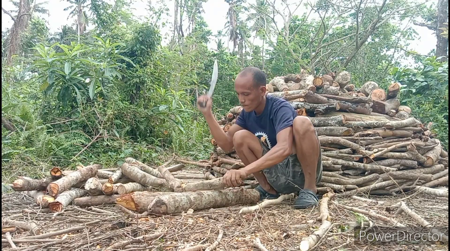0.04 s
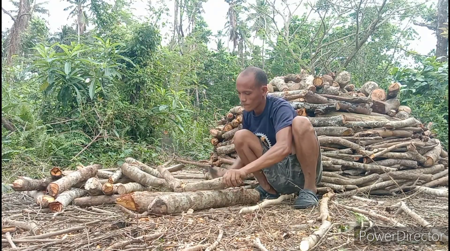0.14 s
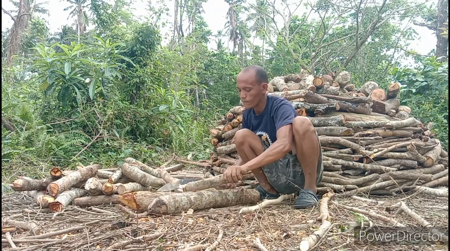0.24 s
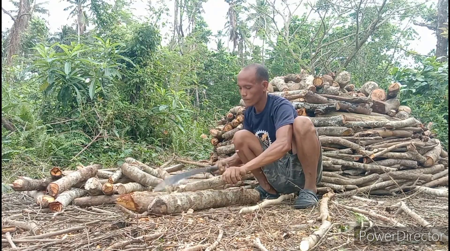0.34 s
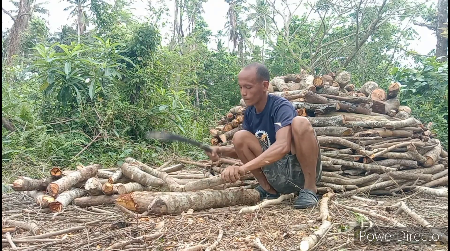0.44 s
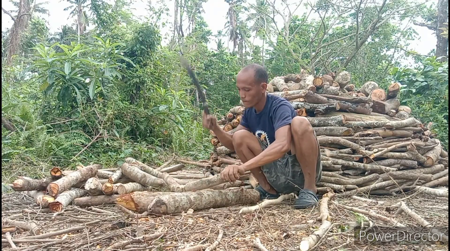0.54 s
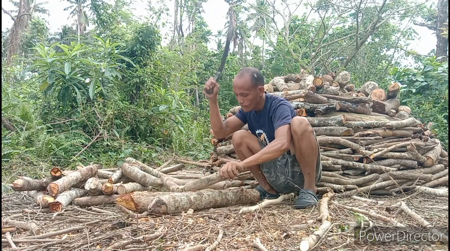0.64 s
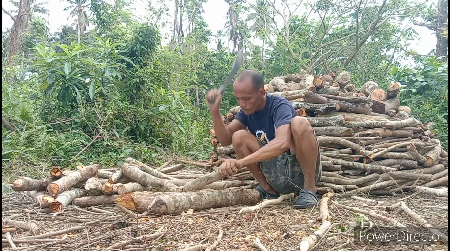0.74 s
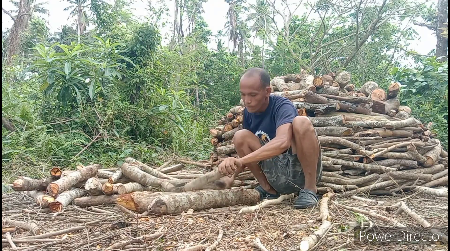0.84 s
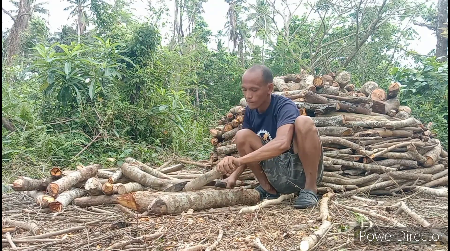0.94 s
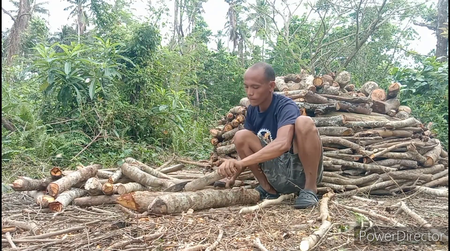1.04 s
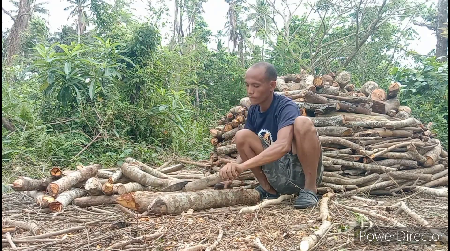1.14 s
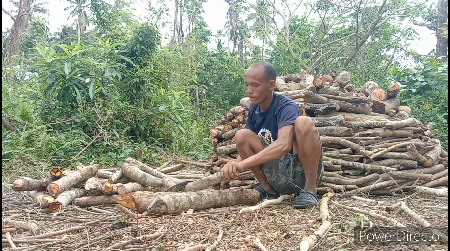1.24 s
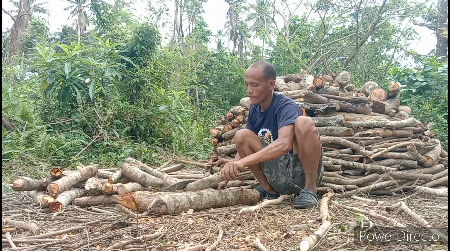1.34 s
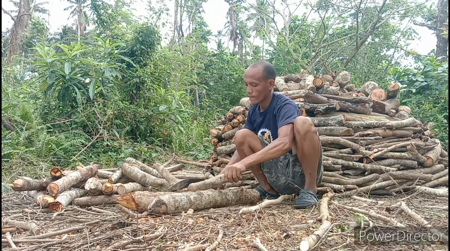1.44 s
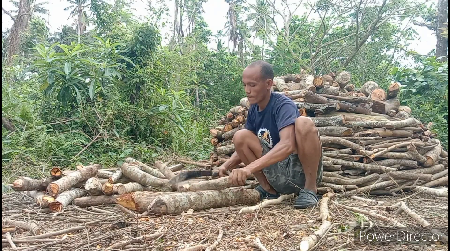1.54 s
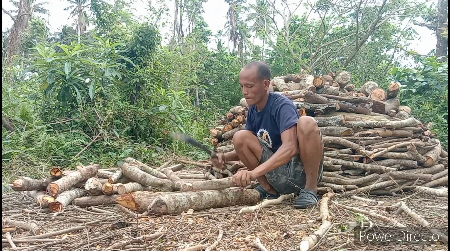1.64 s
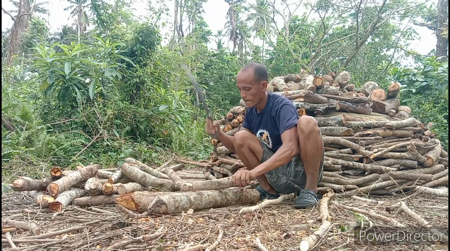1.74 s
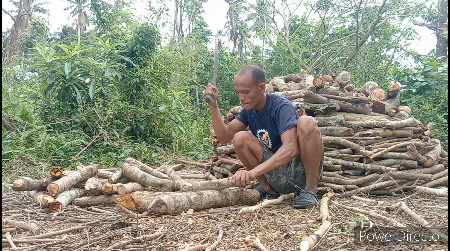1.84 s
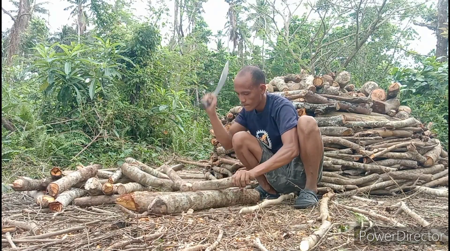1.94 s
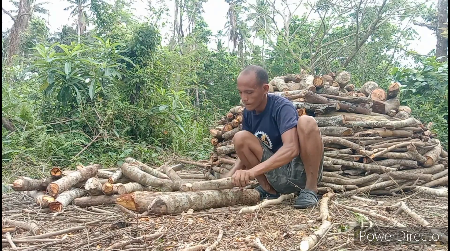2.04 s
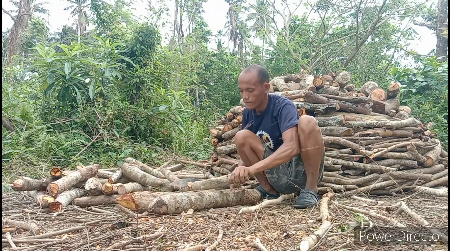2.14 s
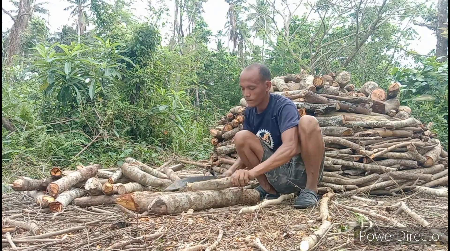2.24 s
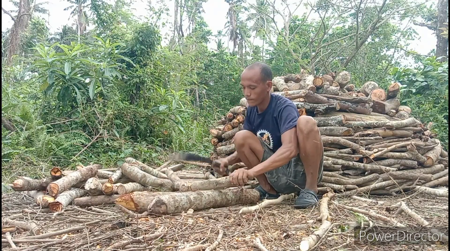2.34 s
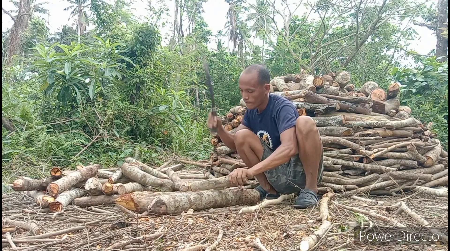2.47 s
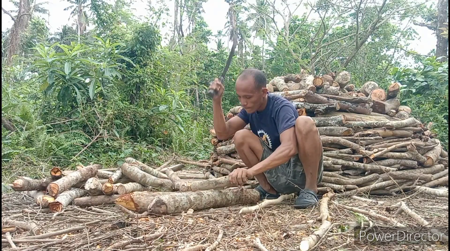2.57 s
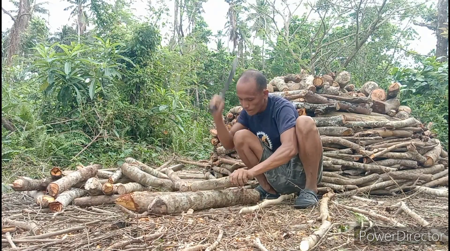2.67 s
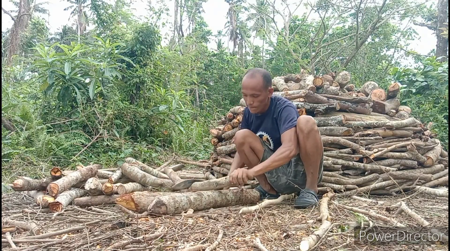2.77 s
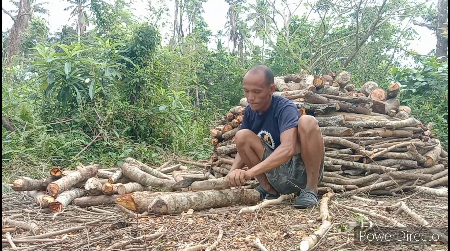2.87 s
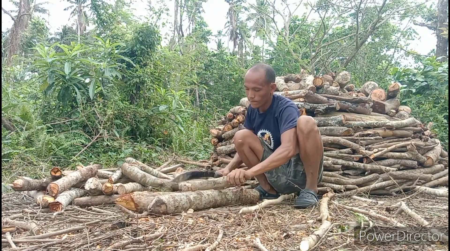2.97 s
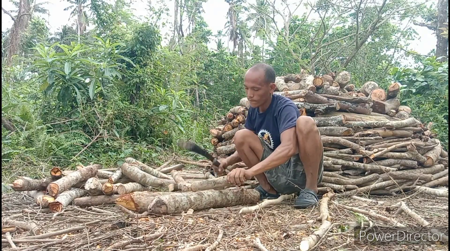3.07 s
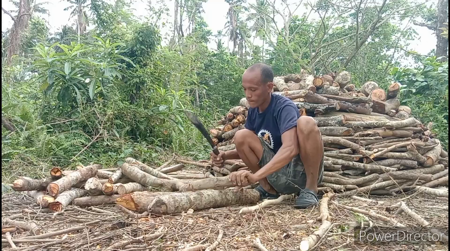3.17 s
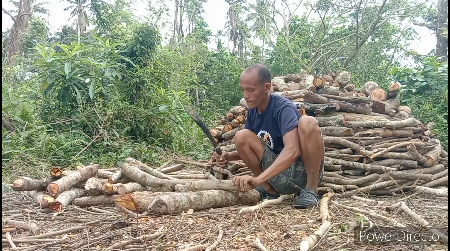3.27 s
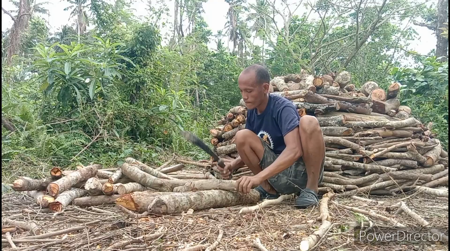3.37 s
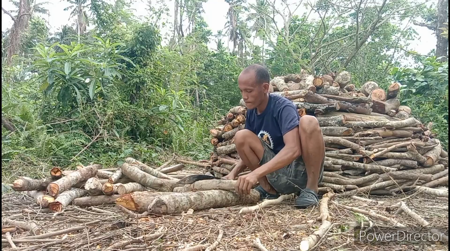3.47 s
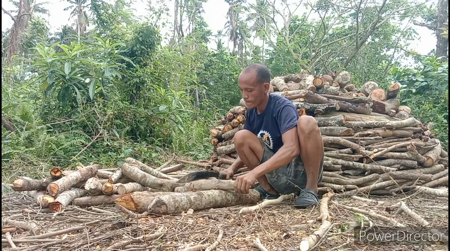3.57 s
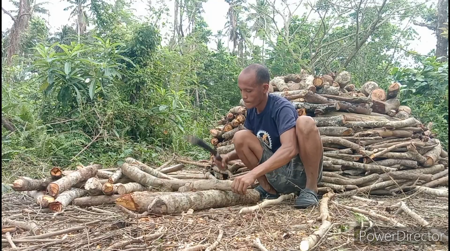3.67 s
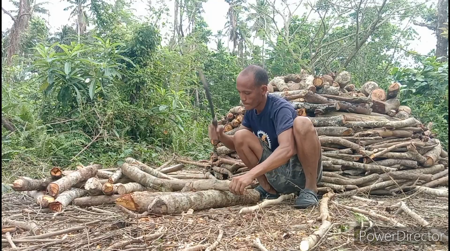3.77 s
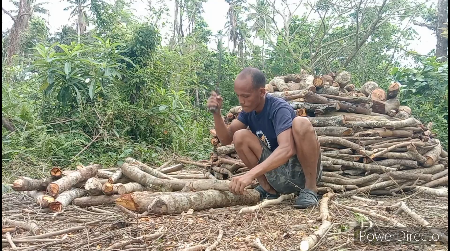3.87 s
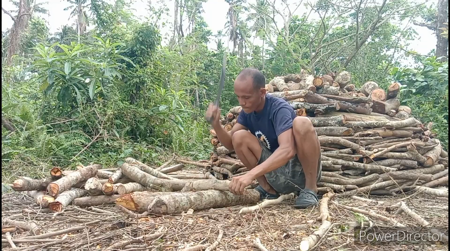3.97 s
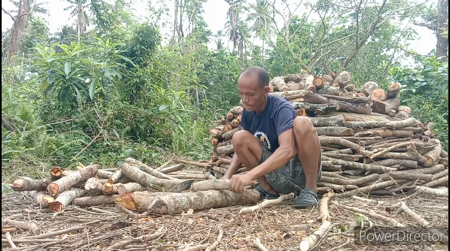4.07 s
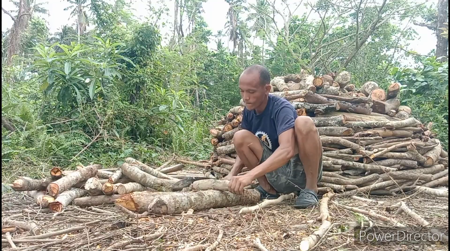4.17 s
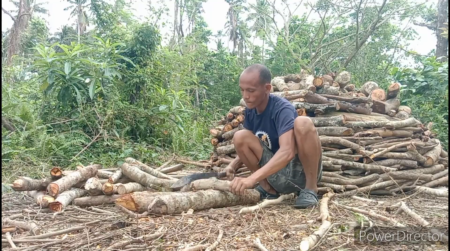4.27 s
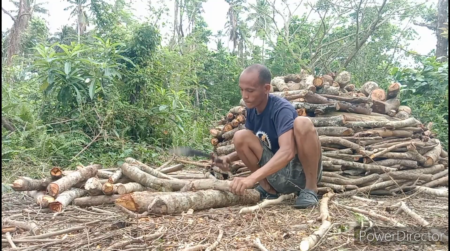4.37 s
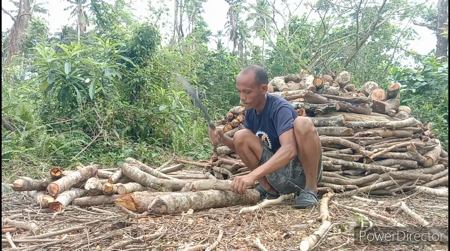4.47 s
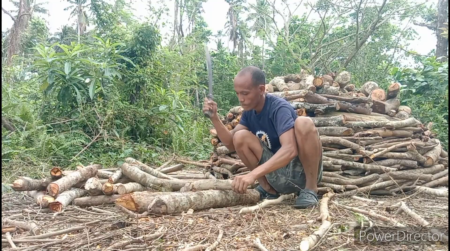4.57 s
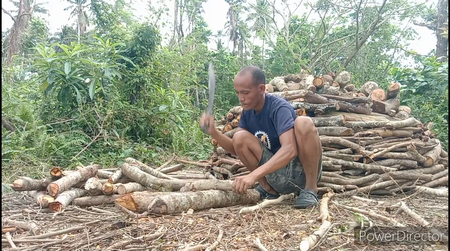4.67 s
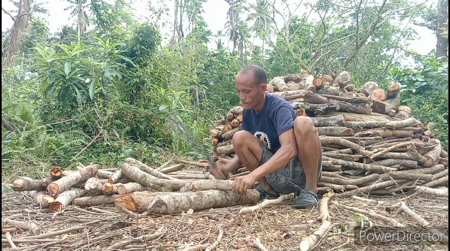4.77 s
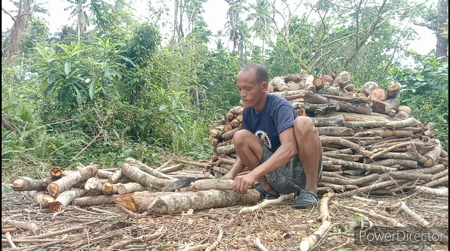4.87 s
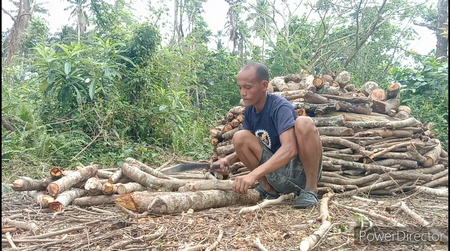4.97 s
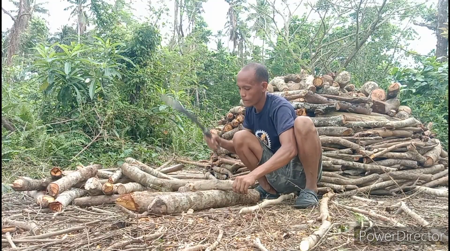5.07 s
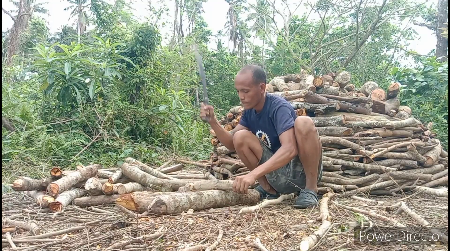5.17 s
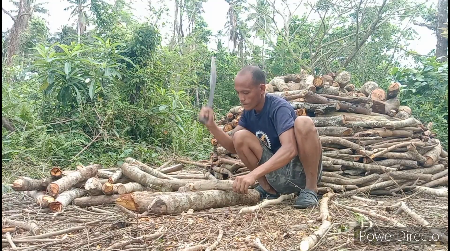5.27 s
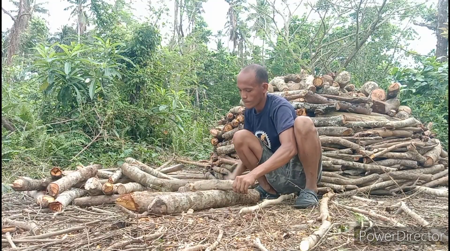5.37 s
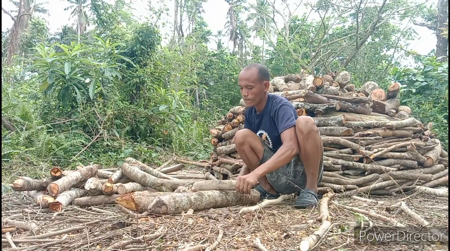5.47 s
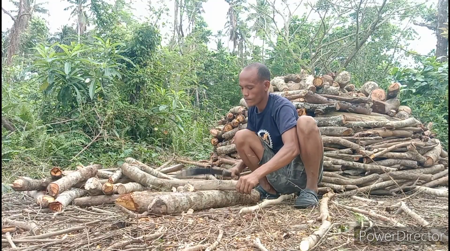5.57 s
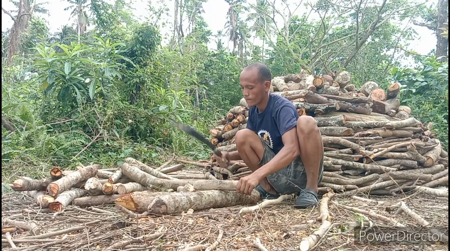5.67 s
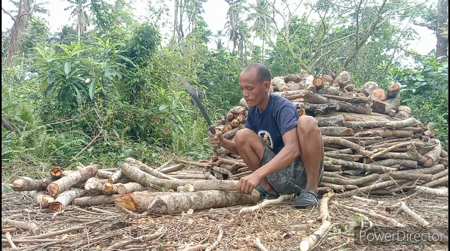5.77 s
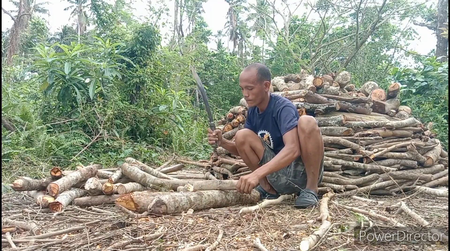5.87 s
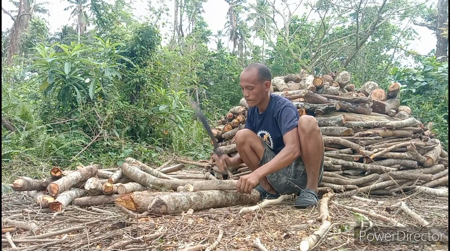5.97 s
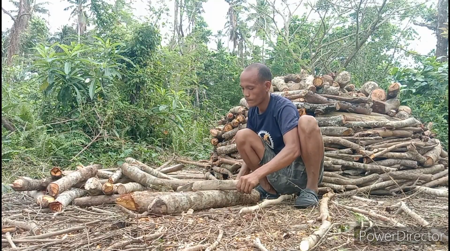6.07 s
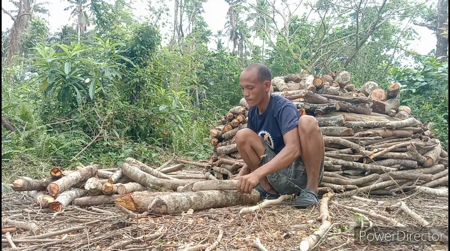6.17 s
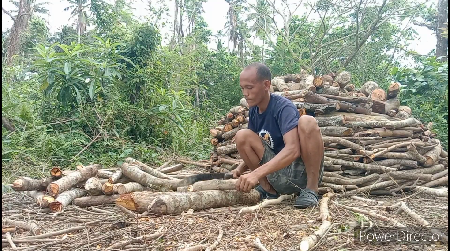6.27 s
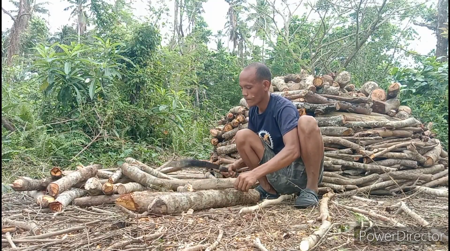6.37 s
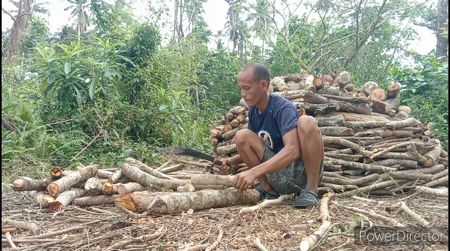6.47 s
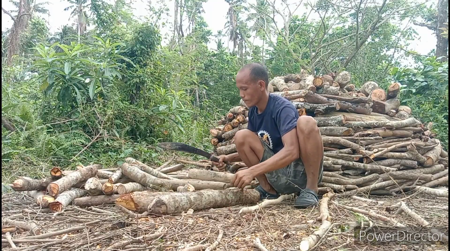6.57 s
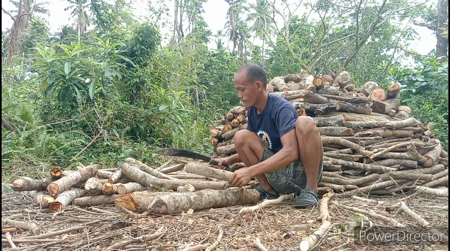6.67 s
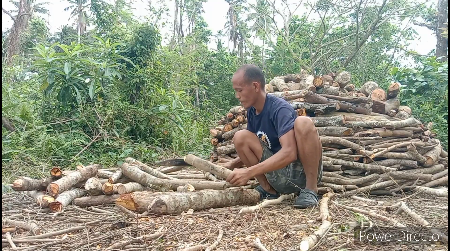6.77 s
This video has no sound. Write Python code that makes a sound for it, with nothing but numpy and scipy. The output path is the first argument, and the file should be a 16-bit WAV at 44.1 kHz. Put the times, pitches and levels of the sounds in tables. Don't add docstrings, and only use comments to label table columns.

```python
import sys
import numpy as np
from scipy import signal
from scipy.fft import rfft, irfft
from scipy.io import wavfile

SR = 44100
rng = np.random.default_rng(int(sys.argv[2]) if len(sys.argv) > 2 else 0)


def to_wav(s):
    ch = np.atleast_2d(s).T
    pcm = np.round(np.clip(ch, -1, 1) * 32767)
    wavfile.write(sys.argv[1], SR, pcm.astype(np.int16))


def undo_db(level):
    steps = np.asarray(level, float) / 20
    return 10 ** steps


N = 300762


def rms_one(x):
    return x / np.sqrt(np.mean(x ** 2) + 1e-20)


def colour(x, points):
    hz = np.maximum(np.fft.rfftfreq(len(x), 1 / SR), 1)
    point_hz, point_db = np.transpose(points)
    gain = undo_db(np.interp(np.log(hz), np.log(point_hz), point_db))
    return irfft(rfft(x) * gain, len(x))


def drift(rate_hz, size=N):
    r = np.exp(-2 * np.pi * rate_hz / SR)
    wander = signal.lfilter([1], [1, -2 * r, r * r], rng.standard_normal(size + SR // 2))
    return rms_one(wander[SR // 2:])


def resonate(x, hz, width_hz):
    r = np.exp(-np.pi * width_hz / SR)
    top = np.array([1, 0, -1]) * (1 - r * r) / 2
    return signal.lfilter(top, [1, -2 * r * np.cos(2 * np.pi * hz / SR), r * r], x)


def add(out, s, piece):
    at = max(round(s * SR), 0)
    out[at:at + len(piece)] += piece[:N - at]


# (pitch [Hz], width [Hz], level [dB])
CHORUS = [(1255, 70, -86.5), (7050, 330, -88), (8050, 1150, -86), (10900, 900, -94.5), (5300, 900, -83.5),
          (2900, 1700, -89.5), (5650, 650, -80.5)]
# (time of one throb's peak [s], period [s])
SINGERS = [(1.277, .1667), (.205, .1658)]
# (time [s], first level [dB], second level [dB])
SINGER_EFFORT = [(0, -75.5, -70.5), (.7, -76, -66.5), (1.2, -70, -79), (1.898, -68.5, -72.5),
                 (2.599, -66.5, -78), (3.3, -64.5, -77), (4.099, -70.5, -73.5), (4.6, -72, -71),
                 (5.3, -76, -67), (5.9, -63.5, -72), (6.4, -71, -74), (6.82, -62, -70)]


def insects(pulse_hz=87.0, depth_db=3.0, trill_hz=5640, width_hz=170.0, throb_depth_db=16.0):
    s, *effort_db = np.transpose(SINGER_EFFORT)
    out, t = 0, np.arange(N) / SR
    for (peak_s, period_s), level_db in zip(SINGERS, effort_db):
        phase = 2 * np.pi * np.cumsum(trill_hz + 70 * drift(2.9)) / SR
        beat = np.sin(2 * np.pi * np.cumsum(pulse_hz * (1 + 0.0097 * drift(1.0))) / SR)
        tone = drift(width_hz) * np.sin(phase) + drift(width_hz) * np.cos(phase)
        buzz = tone * undo_db(depth_db * beat)
        throb_db = -throb_depth_db * np.sin(np.pi * (t - peak_s) / period_s) ** 2
        out = out + rms_one(buzz) * undo_db(np.interp(t, s, level_db) + throb_db)
    for hz, width_hz, level_db in CHORUS:
        edges = [hz - width_hz / 2, hz + width_hz / 2]
        band_filter = signal.butter(3, edges, "band", fs=SR, output="sos")
        hum = signal.sosfilt(band_filter, rng.standard_normal(N))
        out = out + rms_one(hum) * undo_db(level_db + 2.1 * drift(1.7))
    return out


# (frequency [Hz], level per Hz [dB])
AIR_COLOUR = [(25, -35.5), (40, -28), (60, 5.5), (85, -9), (125, -3), (250, -10), (500, -19), (1000, -20),
              (2500, -22.5), (4000, -28), (6500, -36), (9500, -40.5), (13000, -45), (16500, -40.5)]
# (time [s], gust level [dB])
BREEZE = [(0, -1), (.8, -0.5), (1.6, -1), (2.6, -0.5), (3.6, 0.5), (4.7, -1), (5.4, 2), (6.2, 1), (6.6, 1),
          (6.82, 11)]
RUMBLE_DB, HISS_DB, HISS_FOLLOWS = -76, -83, 0.33
SWELL_DB, SWELL_S = 4, 0.14


def air(split_hz=400):
    t, noise = np.arange(N) / SR, colour(rng.standard_normal(N), AIR_COLOUR)
    gust_db = np.interp(t, *np.transpose(BREEZE))
    for s, crack_db, *_ in BLOWS:
        if crack_db > -30:
            gust_db = gust_db + SWELL_DB * (t > s) * np.exp(-np.abs(t - s) / SWELL_S)
    rumble = signal.filtfilt(*signal.butter(2, split_hz, fs=SR), noise)
    hiss = noise - rumble
    return rms_one(rumble) * undo_db(RUMBLE_DB + gust_db) + rms_one(hiss) * undo_db(HISS_DB + HISS_FOLLOWS * gust_db)


# (time [s], length [s], start pitch [Hz], end pitch [Hz], level [dB])
FAR_CALLS = [(0.065, 0.11, 2070, 2130, -76), (0.925, 0.15, 2180, 2130, -82),
             (1.096, 0.21, 2240, 2190, -78.5), (1.777, 0.19, 2090, 2200, -76),
             (1.78, 0.029, 2060, 2240, -65.5), (2.09, 0.12, 1260, 1290, -78),
             (2.756, 0.079, 1263, 1290, -66.5), (2.837, 0.16, 1300, 1280, -58.5),
             (3.754, 0.16, 1910, 1890, -86), (4.67, 0.38, 1390, 1504, -85), (4.8, 0.59, 1260, 1290, -81),
             (5.222, 0.12, 2670, 2700, -74), (5.32, 0.061, 2050, 1450, -80), (5.43, 0.2, 3350, 3470, -83.5),
             (6.375, 0.1, 2870, 2750, -78), (6.416, 0.25, 3800, 3940, -82.5),
             (6.47, 0.062, 2030, 1620, -78.5), (6.65, 0.25, 3940, 4160, -79)]
# (time [s], length [s], start pitch [Hz], end pitch [Hz], level [dB])
FAR_CHIRPS = [
    (0.028, 0.13, 3000, 2970, -81.5),
    (1.378, 0.11, 2304, 2020, -71.5),
    (1.836, 0.14, 3406, 3556, -74.5),
    (2.557, 0.084, 7430, 6530, -76),
    (5.423, 0.057, 7100, 6740, -73.5),
    (6.164, 0.038, 6400, 6050, -74),
    (6.639, 0.048, 6780, 6400, -59.5),
]
CALL_BLUR, CHIRP_BLUR = .018, .075


def far_birds(fade_db=4.0, taper=0.62):
    out = np.zeros(N)
    for calls, blur in ((FAR_CALLS, CALL_BLUR), (FAR_CHIRPS, CHIRP_BLUR)):
        for s, length_s, start_hz, end_hz, level_db in calls:
            size, blur_hz = round(length_s * SR), blur * start_hz
            phase = 2 * np.pi * np.cumsum(np.linspace(start_hz, end_hz, size)) / SR
            steady = (50 / blur_hz + drift(blur_hz, size)) * np.sin(phase)
            tone = rms_one(steady + drift(blur_hz, size) * np.cos(phase))
            shape = signal.windows.tukey(size, taper) * undo_db(np.linspace(fade_db, -fade_db, size))
            add(out, s, undo_db(level_db) * tone * shape)
    return out


def trees(near, far, echo_db=-40.0, echo_t60_s=0.5, far_echo_db=-8.0):
    t = np.arange(SR) / SR
    echo = undo_db(echo_db - 60 * t / echo_t60_s) * rng.standard_normal(SR) * (t > .02)
    return near + far + signal.fftconvolve(near + undo_db(far_echo_db) * far, echo)[:N]


def body(x, peaks, widen):
    out = 0
    for k, (hz, width_hz, level_db) in enumerate(peaks):
        out = out + (-1) ** k * undo_db(level_db) * resonate(x, hz, widen * width_hz)
    return out


# (centre [Hz], width [Hz], level [dB])
CRACK_BANDS = [(2750, 1200, -2), (515, 300, 4.5), (1250, 110, 3.5), (4730, 2700, 5), (9640, 950, -4),
               (15100, 1300, -12.5), (850, 180, 2), (1750, 500, -8)]


def crack(levels_db, peaks, bite_s, t, fall_s=0.0024, spread_db=4.5, ring_db=3.5):
    out, force = 0, (1 - np.exp(-(t / bite_s) ** 2)) * np.exp(-t / fall_s)
    for level_db, (hz, width_hz, band_db) in zip(levels_db, CRACK_BANDS):
        uneven = undo_db(spread_db * np.minimum(rng.exponential(1, len(t)), 4))
        snaps = force * rng.standard_normal(len(t)) * uneven
        ringing = snaps + undo_db(ring_db) * body(snaps, peaks, widen=2.2)
        burst = resonate(resonate(ringing, hz, width_hz), hz, 2 * width_hz)
        out = out + undo_db(level_db + band_db) * burst / np.abs(burst).max()
    return out


# (frequency [Hz], level per Hz [dB])
SCATTER_COLOUR = [(410, -51), (700, -23), (1050, -15.5), (1270, -0.5), (2360, -8.5), (2800, -3), (3410, -9),
                  (6860, -9), (8150, -16.5), (15200, -22), (16400, -43.5)]


def scatter(level_db, peaks, between_db, top_db, t, t60=0.54, patchy=0.4):
    size, few_ms = len(t), t[:SR // 100]
    unsteady_db = 1.8 * drift(120, size) + [3.4 * drift(35, size), 1.5 * drift(25, size)]
    grains = rng.standard_normal((2, size)) * undo_db(unsteady_db)
    splinter = rng.standard_normal(SR // 100) * np.exp(-few_ms / 0.0042)
    splinter = patchy * splinter / np.linalg.norm(splinter) + (few_ms == 0)
    broad = colour(signal.fftconvolve(grains[1], splinter)[:size], SCATTER_COLOUR)
    broad = broad + (undo_db(top_db) - 1) * resonate(broad, hz=12500, width_hz=11000)
    wash = body(grains[0], peaks, widen=2.2) + undo_db(between_db) * broad
    return undo_db(level_db - 22 - 60 * t / t60) * rms_one(wash) * (1 - np.exp(-t / .004))


# (frequency [Hz], level per Hz [dB])
GROUND = [(30, -27), (60, 2), (130, 7), (250, -12), (400, -6), (800, -20.5), (1500, -52)]
# (pitch [Hz], level [dB], time to fall 60 dB [s], sense of first swing [factor])
WOOD = [
    [(128, -4, 0.12, 0.88), (169, -1, 0.16, -0.31), (215.4, -1.5, 0.074, 0.98), (307, -8, 0.043, 0.88)],
    [(493.7, 7.5, 0.36, 0.79), (541, 5, 0.72, -0.45)],
    [(608.4, 7, 0.18, 0.93), (515, -4.5, 0.17, 0.89)],
    [(1126, 4, 0.1, 0.99), (1260, 3.5, 0.036, -2.6)],
]


def wood(levels_db, partner_db, t, push_s=0.0024, ground_db=-21.5, ground_t60=0.57):
    shudder = rms_one(colour(rng.standard_normal(len(t)), GROUND))
    out = undo_db(levels_db[0] + ground_db - 60 * t / ground_t60) * shudder
    for level_db, modes in zip(levels_db, WOOD):
        for k, (hz, mode_db, t60, sense) in enumerate(modes):
            height = undo_db(level_db + mode_db + partner_db * (k == 1) - 60 * t / t60)
            out = out + sense * height * np.sin(2 * np.pi * hz * t)
    return out * (1 - np.exp(-(t / push_s) ** 2))


# (time [s], crack peak [dB], then relative to it: dull knock [dB], hollow knock [dB], brightness [dB])
BLOWS = [
    (0.3208, -7, -22, -15, -2),
    (1.016, -11.5, -12, -8.5, 1.5),
    (2.2375, -7, -23, -7.5, -0.5),
    (2.9331, -7, -7, -7, -3),
    (3.6359, -42, -1, 0.5, 9),
    (4.2527, -13.5, -21, -24.5, 4.5),
    (4.959, -12.5, -16.5, -29.5, 5.5),
    (5.548, -10, -8.5, -6.5, 4),
    (6.2307, -12.5, -14, -18.5, -24.5),
]
# (log thud [dB], lower pair [dB], upper pair [dB], 1.1 kHz mode [dB], partner modes [dB])
RINGS = [(-20, -58, -39, -38, -0.5), (-19, -41, -29.5, -30.5, 2), (-22.5, -35, -43.5, -31.5, -9),
         (-17, -24, -38, -27, -2.5), (-43, -57.5, -62.5, -46.5, -11), (-18, -32, -39.5, -38, 1),
         (-18, -38, -77, -30.5, -1), (-17.5, -56, -38.5, -23.5, 3.5), (-31, -44.5, -26.5, -28, 1)]
# (pitch [Hz], width [Hz], level [dB])
GRAIN = [(1080, 75, -7.5), (1290, 60, -8.5), (1670, 120, -11.5), (2990, 35, -9), (3200, 90, -9.5),
         (3510, 33, -6.5), (4330, 50, -10.5), (5280, 180, -11), (7030, 160, -11.5), (7900, 41, -16),
         (10370, 450, -16)]
# (first pitch [Hz], level [dB], second pitch [Hz], level [dB], common resonances [dB])
SPOTS = [(2718, 4.5, 4450, -1, -5.5), (1250, -5, 7050, -8, -2), (2900, -2, 4690, -2, 0),
         (2870, -2.5, 1560, -3.5, -4.5), (1240, 4.5, 2430, -14, -11), (1250, -7, 3500, -4.5, -5),
         (7050, 3.5, 9570, -6, 1), (1146, 5, 4800, 2, -1.5), (1118, 2.5, 3170, -19, -2)]
# (scatter [dB], wash between resonances [dB], suppression closes at [s], down to [dB])
TAILS = [(-9, -7.5, 0.15, -16.5), (-16.5, 1.5, 0.19, -34.5), (-12, 1.5, 0.2, -20), (-14.5, -8.5, .19, -17),
         (-36, -16, 0.1, -33), (-21, -9.5, .19, -23.5), (-16, -6, .19, -30), (-15.5, 4.5, .17, -21),
         (-20.5, 5, .18, -33)]
START_S, SPOT_WIDTH_HZ = -.0008, 70
SPLIT_DB, SPLINTER_DB = -6, -12.5
SPLIT_FOLLOWS, TOP_FOLLOWS = .3, 0.59
CLEAN_BITE_S, DEEP_BITE_S = .001, .002
GRAIN_TILT = 0.16


def blow_peaks(spot, bright_db):
    hz_1, db_1, hz_2, db_2, common_db = spot
    peaks = []
    for hz, width_hz, level_db in GRAIN:
        tilt_db = GRAIN_TILT * bright_db * max(np.log2(hz / 3000), 0)
        peaks.append((hz, width_hz, level_db + common_db + tilt_db))
    return peaks + [(hz_1, SPOT_WIDTH_HZ, db_1), (hz_2, SPOT_WIDTH_HZ, db_2)]


def chops(ring_closing=2.0):
    out, t = np.zeros(N), np.arange(SR // 2) / SR
    for blow, (*ring_db, partner_db), spot, tail in zip(BLOWS, RINGS, SPOTS, TAILS):
        s, crack_db, dull_db, hollow_db, bright_db = blow
        wet_db, between_db, closing_s, closed_db = tail
        peaks = blow_peaks(spot, bright_db)
        split_db = SPLIT_DB + SPLIT_FOLLOWS * bright_db
        splinter_db = SPLINTER_DB + bright_db
        top_db = TOP_FOLLOWS * bright_db
        levels_db = crack_db + np.array([0, dull_db, hollow_db, split_db, splinter_db,
                                         splinter_db + top_db, dull_db, (hollow_db + split_db) / 2])
        bite_s = DEEP_BITE_S if ring_db[2] > ring_db[1] else CLEAN_BITE_S
        closing = undo_db(closed_db * (1 - np.exp(-(t / closing_s) ** 4)))
        wash = scatter(wet_db, peaks, between_db, top_db, t)
        add(out, s + START_S, crack(levels_db, peaks, bite_s, t) + wash * closing)
        add(out, s + START_S, wood(ring_db, partner_db, t) * closing ** ring_closing)
    return out


# (time [s], peak level [dB], ring pitch [Hz], crackle level [dB])
CHIPS = [(.563, -53, 1500, -82), (0.754, -45.5, 5750, -76), (.768, -62, 7050, -64.5),
         (.805, -42, 2720, -49.5), (.822, -49, 10500, -47), (0.916, -54.5, 2410, -77),
         (1.393, -38, 2084, -48), (1.585, -55, 3500, -74), (1.601, -60, 3020, -54),
         (1.621, -57.5, 3400, -73), (2.258, -17.5, 2985, -37), (2.667, -57, 2920, -70),
         (2.797, -66.5, 4040, -63), (2.949, -21, 3000, -20.5), (3.41, -71, 2490, -70),
         (3.639, -32, 3750, -70), (6.253, -28, 3020, -54.5)]
# (time [s], peak level [dB], ring pitch [Hz], time to fall 60 dB [s])
KNOCKS = [(.37, -48, 1280, .4), (.62, -63, 1280, .06), (.806, -51, 1750, 0.031), (0.821, -51, 1286, 0.076),
          (0.823, -55, 2800, 0.028), (1.393, -47.5, 1310, 0.046), (2.597, -66, 2920, .03),
          (3.303, -47.5, 746, 0.022), (3.38, -64.5, 1490, .026), (3.395, -62, 1057, 0.056),
          (3.446, -52, 494, 0.28), (3.447, -62.5, 1163, .19), (3.458, -57.5, 541, .5),
          (3.5, -61, 687, 0.057), (3.502, -56.5, 1250, 0.057), (3.634, -43, 2595, .041),
          (3.991, -61.5, 3200, .025), (6.10, -59.5, 2100, 0.021)]
CHIP_T60_S, KNOCK_CRACKLE_DB = 0.011, -21


def chips_and_knocks():
    out, t = np.zeros(N), np.arange(SR // 5) / SR
    contacts = [(s, db, hz, CHIP_T60_S, crackle_db) for s, db, hz, crackle_db in CHIPS]
    contacts += [(s, db, hz, t60, db + KNOCK_CRACKLE_DB) for s, db, hz, t60 in KNOCKS]
    for s, peak_db, hz, t60, crackle_db in contacts:
        fall = undo_db(peak_db - 60 * t / t60 - 20 * (t / .085) ** 4)
        ring = fall * np.sin(2 * np.pi * hz * t) * (1 - np.exp(-t / 0.00079))
        grit = resonate(rng.standard_normal(len(t)), 3700, 6300) * np.exp(-t / 0.0021)
        add(out, s, ring + undo_db(crackle_db - 2.0) * grit)
    return out


# (time [s], length [s], level [dB], centre [Hz])
RUSTLES = [
    (0.802, 0.043, -67.5, 6000),
    (1.383, 0.078, -82, 2300),
    (1.577, 0.053, -74.5, 4510),
    (3.3, 0.034, -73.5, 896),
    (3.371, 0.066, -77, 2485),
    (3.398, 0.14, -80, 6360),
    (3.469, .06, -77.5, 2010),
    (3.96, 0.1, -76, 2960),
    (5.853, 0.22, -81.5, 4400),
]


def rustles(spread_db=3.5, breadth=0.89, grains_per_s=1500):
    out = np.zeros(N)
    for s, length_s, level_db, hz in RUSTLES:
        chance, size, side = rng.random((SR // 2, 3))[:round(length_s * SR)].T
        height = undo_db(-spread_db * np.log(size + 0.0051))
        clicks = (chance < grains_per_s / SR) * height * np.sign(side - .5)
        rustle = resonate(resonate(clicks + 1e-18, hz, breadth * hz), hz, breadth * hz)
        add(out, s, undo_db(level_db) * rms_one(rustle) * np.hanning(len(clicks)) ** .5)
    return out


# (time from its start [s], pitch [Hz], level [dB])
WHISTLE = [(0, 2200, -28), (.055, 2100, -27.5), (.105, 1860, -6), (.175, 1828, 2.5), (.215, 1730, -3),
           (.27, 1545, -6.5), (.3, 1440, -6.5), (.33, 1290, 4.5), (0.361, 1270, -14)]
# (time [s], level [dB], pitch [factor])
WHISTLES = [
    (5.359, -53, .99),
    (6.52, -47, 1.005),
]


def near_bird():
    out, (s, hz, level_db) = np.zeros(N), np.transpose(WHISTLE)
    t = np.arange(0, s[-1], 1 / SR)
    edge = np.sqrt(2) * np.clip(np.minimum(t, s[-1] - t) / 0.02, 0, 1)
    turns = np.cumsum(np.interp(t, s, hz)) / SR
    for start_s, db, pitch in WHISTLES:
        height = edge * undo_db(db + np.interp(t, s, level_db))
        add(out, start_s, height * np.sin(2 * np.pi * pitch * turns))
    return out


def scene():
    birds = trees(near_bird(), far_birds())
    return (insects() + air() + birds + chops() + chips_and_knocks() + rustles())[None]


def top_cut(x):
    return signal.sosfilt(signal.butter(12, 16800, fs=SR, output="sos"), x)


def record(dry):
    heard = dry + undo_db(-2.0) * resonate(dry, hz=16200, width_hz=1500)
    heard = signal.sosfilt(signal.butter(2, 50, "high", fs=SR, output="sos"), heard)
    limited = 1.15 * np.tanh(heard / 1.05)
    finished = signal.sosfilt(signal.cheby2(12, 60, 16500, fs=SR, output="sos"), limited)
    return top_cut(finished)


dry = scene()
out = record(dry)
to_wav(out)
```